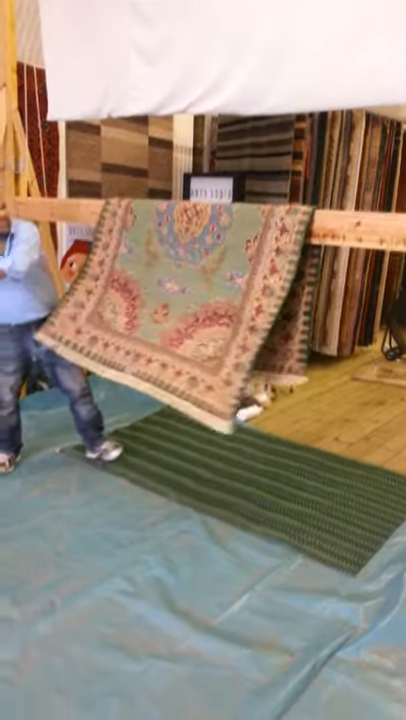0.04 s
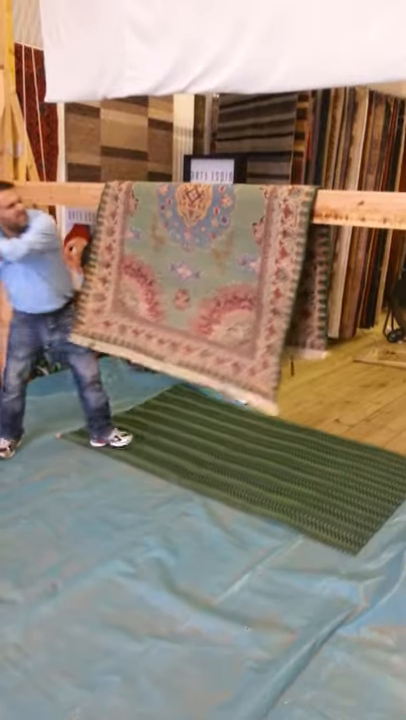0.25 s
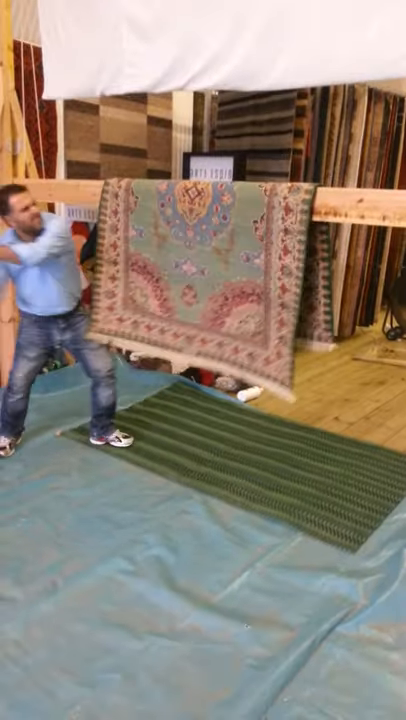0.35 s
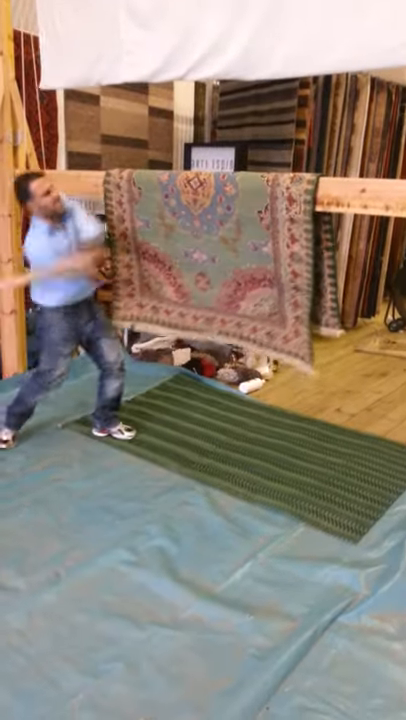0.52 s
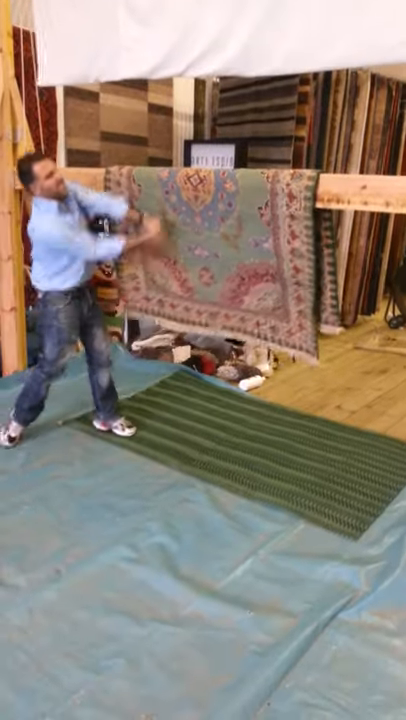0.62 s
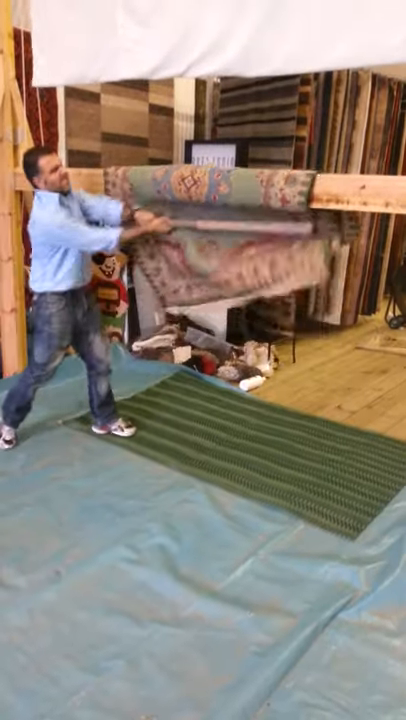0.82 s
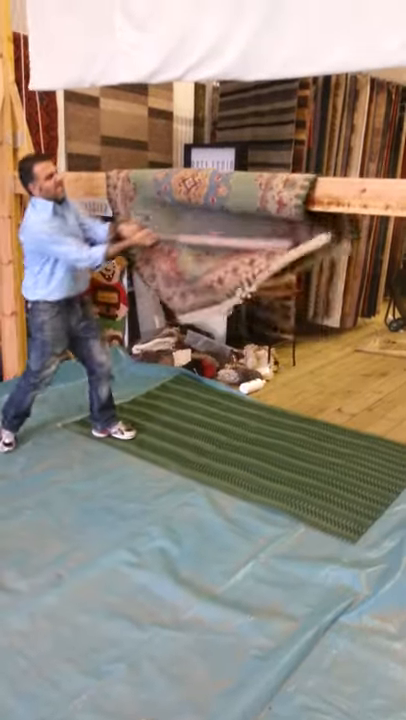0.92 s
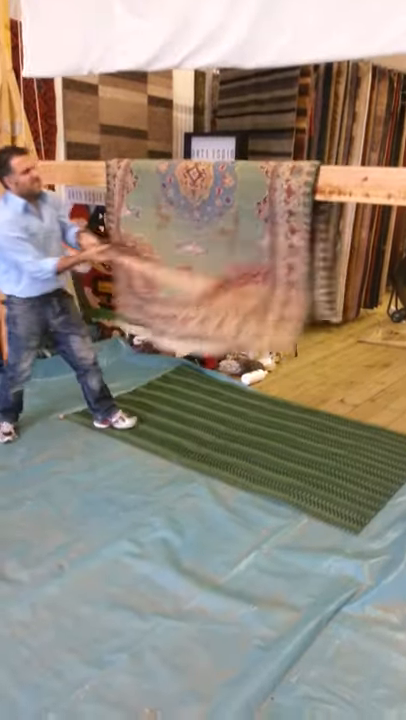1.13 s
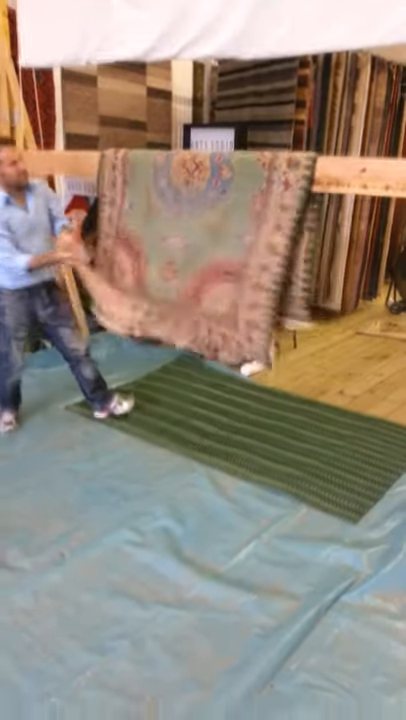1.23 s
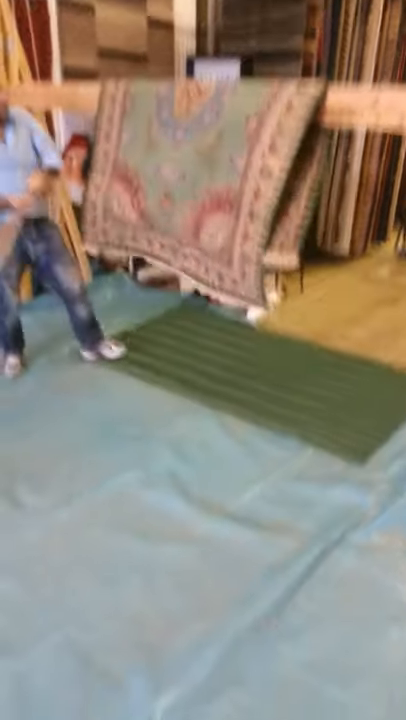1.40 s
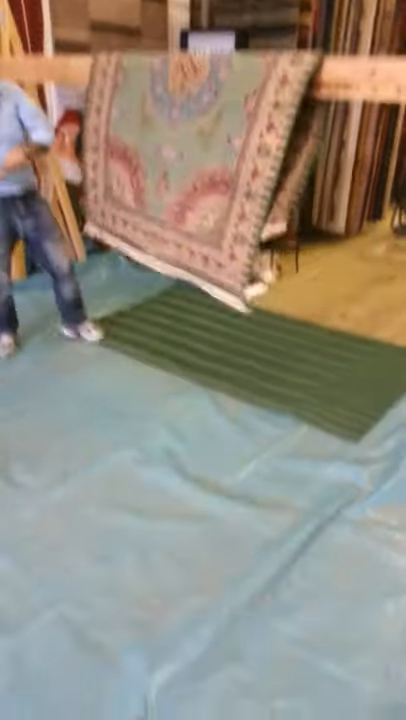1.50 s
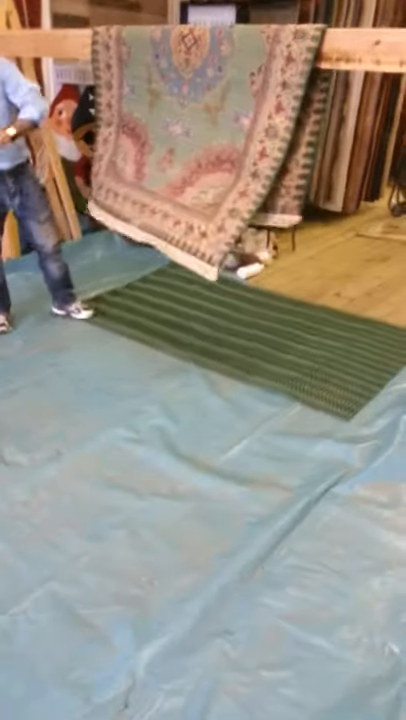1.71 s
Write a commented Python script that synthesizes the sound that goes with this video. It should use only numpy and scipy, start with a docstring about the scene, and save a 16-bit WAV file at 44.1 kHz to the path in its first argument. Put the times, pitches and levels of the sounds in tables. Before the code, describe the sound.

One loud, overloaded thwack on a thick rug, with a dull flap and ringing hall after

```python
"""A machine drones across a large workshop hall and swells; then, close by, a flat beater slaps a heavy rug on a beam.
The slap is a run of noise bursts that overloads two close microphones of a hand-held recorder.
The rug booms in decaying modes and flaps back dully, a few knocks ring modes of rug and wood, the hall rings on as noise.
The far drone is shaped noise with wandering hum tones; the overload lurches low at the slap; a low hum comes early."""
import sys
import numpy as np
from scipy import signal
from scipy.io import wavfile
from scipy.ndimage import uniform_filter1d

SR = 44100
rng = np.random.default_rng(int(sys.argv[2]) if len(sys.argv) > 2 else 0)


def pcm_store(signal):
    """Save signal as 16-bit PCM."""
    levels = np.round(np.clip(np.atleast_2d(signal), -1, 1) * 32767)
    wavfile.write(sys.argv[1], SR, levels.astype(np.int16).T)


N = 77175  # samples, 1.75 s

BLOW_S = 0.7305
# close slap, beater and rug layers clapping: start_s after the blow, level_db, brightness_db_per_octave
SLAP_CLAPS = [(0, 1, 2), (.005, 2.5, 1.5), (0.012, -6, 2), (0.019, -1, 1), (0.025, 0, 2.5), (0.034, -2, 1),
              (0.043, 3.5, -0.5), (0.055, -6, 2), (0.062, -7.5, 1.5), (0.072, -11, 1), (.09, -15, -0.5),
              (0.137, -4.5, -2.5), (0.181, -11, -1)]
# colour of the slap: pitch_hz, level_db per Hz
SLAP_SPECTRUM = [(40, -50), (120, -23.5), (250, -10.5), (420, -21), (550, -14), (850, -13.5), (1050, -12.5),
                 (1300, -13), (1600, -12.5), (2500, -13), (4500, -18), (6000, -28), (10000, -40),
                 (18000, -78)]
# how fast each clap dies away: pitch_hz, t60_s
SLAP_DECAY = [(100, 0.06), (400, 0.27), (1500, 0.052), (4500, 0.047), (7000, 0.044), (12000, 0.056)]
SLAP_DB, CLAP_RISE_S = -3.5, 0.00037
# later claps are duller: loss above the corner, dB per octave for each second after the blow
LATE_DULL_HZ, LATE_DULL_DB_PER_S = 5500, 152

# boom of the hanging rug: pitch_hz, level_db, t60_s, start_s after the blow
RUG_BOOM_MODES = [(210, 6.5, 0.085, 0.0183), (287, -3.5, 0.071, 0.0018), (314.7, 0.5, 0.14, 0.011),
                  (369.4, -8, 0.25, 0.0265), (504.5, 4, 0.071, 0.00058), (586.5, -0.5, 0.11, 0.016),
                  (731, -8, 0.25, 0.0061), (828, -7, 0.16, .055), (992, -3, 0.13, 0.011),
                  (1140, -6.5, 0.066, 0.0023)]
BOOM_RISE_CYCLES = 0.51  # low modes build slower

# low lurch of the overloaded recorder, strongest on the left; the right level is relative to the left
LURCH_S, LURCH_LENGTH_S, LURCH_HZ, LURCH_DB, LURCH_RIGHT_DB = 0.73, 0.043, 66.5, -11.5, -14

# a dull rug flap at 0.9118 s, then knocks: start_s, level_db, brightness_db_per_octave
FLAP_AND_KNOCKS = [(0.9118, -10, -10.5), (.9487, 0, 1.5), (1.0035, -8.5, 14), (1.2255, -20, -10),
                   (1.2575, -19, 0)]
# modes of rug (283, 520 Hz) and wood: pitch_hz, level_db, t60_s
FLAP_AND_KNOCK_MODES = [(283, -17.5, 0.083), (520, -26, 0.039), (686, -17, .06), (756, -13.5, 0.33),
                        (860, -18, .04), (987, -5, .07), (1112, -17.5, 0.04), (1320, -16, 0.018),
                        (1585, -18.5, 0.023)]
KNOCK_THIN_HZ, KNOCK_SOFT_HZ = 216, 2200  # low and high edges of flap and knocks

# ring of the hall after the slap: pitch_hz, level_db per Hz
HALL_SPECTRUM = [(40, -62), (120, -20), (200, -12), (285, -0.5), (420, -3), (700, -2.5), (1000, -7.5),
                 (1500, -14), (2500, -15.5), (4400, -12), (6000, -26.5), (8000, -33), (10000, -71)]
# decay of the hall: pitch_hz, t60_s
HALL_DECAY = [(100, 1.3), (400, 1.02), (1000, 1.5), (3000, 0.96), (8000, 0.43)]
HALL_DB, HALL_RISE_S = -4, 0.054

# drone of the far machine: pitch_hz, level_db per Hz
DRONE_SPECTRUM = [(40, -50), (90, -26.5), (185, -19), (225, -14), (300, -6), (410, -9), (480, -1),
                  (650, -2.5), (880, -4), (1100, -5.5), (1500, -11), (2100, -14), (3000, -12),
                  (4200, -17.5), (4900, -21), (5800, -32.5), (8000, -35.5), (10500, -43), (13000, -69)]
DRONE_DB = -23
# hum tones in the drone: pitch_hz, level_db rms at rest
DRONE_HUMS = [(231.5, -42), (290.7, -44), (349.9, -41.5), (463.0, -37), (662.1, -36), (753.7, -40),
              (888.2, -37.5)]
TONE_WANDER_HZ, TONE_WAVER_DB = 2.66, 0.5  # rms spreads
# drone swelling like a far reverberant stroke: start_s, level_db over the drone, rise_s, t60_s
DRONE_SWELLS = [(.228, 5.5, 0.014, 0.48), (.36, 5, 0.013, 0.85), (.455, -1, .012, 0.41),
                (1.21, 1, .012, 0.98), (1.46, 3.5, 0.014, 0.38), (1.525, -2, .01, 0.19)]
# colour of the swells: pitch_hz, level_db against the drone
SWELL_TILT = [(100, 0), (300, -1.5), (1000, 2.5), (3000, -0.5), (10000, 0.5)]

# a brief low hum
HUM_S, HUM_LENGTH_S, HUM_HZ, HUM_DB = 0.276, 0.19, 147, -43

# what the two microphones share: pitch_hz, likeness (-1 to 1)
MIC_LIKENESS = [(60, 0.65), (95, 0.96), (150, 0.91), (240, 0.96), (380, 0.82), (600, 0.66), (950, 0.45),
                (1500, -0.28), (2380, 0.41), (3770, -0.18), (5980, 0.02), (9470, -0.046), (15000, -0.45)]
# balance of the microphones: pitch_hz, left_over_right_db
MIC_BALANCE = [(60, 3), (240, 0.5), (950, 1), (1500, 2), (2200, 2), (2900, 7), (4000, 8.5), (4900, 6.5),
               (5700, 0), (7000, -6), (8800, -1.5), (10200, 14.5), (15000, 20)]
PATCHY_DB = 0.6  # slow unevenness of each noise band
MIC_LOW_HZ, CUTOFF_HZ = 115, 16500  # bass roll-off, and edge of the top cut
DUCK_DB_PER_DB, DUCK_FROM_DB, RECOVER_DB_PER_S = 0.2972, -13, 24.5
CLIP_TOP, CLIP_HARDNESS = 1.04, 4.0


def from_db(db):
    """Decibels to amplitude gain."""
    return 10 ** (np.asarray(db) / 20)


def at_hz(points, hz):
    """Reads a pitch table on a log-frequency axis."""
    table = np.array(points)
    return np.interp(np.log(hz), np.log(table[:, 0]), table[:, 1])


def rms_one(x):
    """Scales to rms 1."""
    return x / np.sqrt(np.mean(x ** 2) + 1e-20)


def burst(start, rise, t60):
    """Amplitude envelope: quick rise, exponential fall."""
    t = np.maximum(np.arange(N) / SR - start, 0)
    return (1 - np.exp(-t / rise)) * from_db(-60 * t / t60)


def swell(start, length, hz):
    """A low tone that swells and fades."""
    t = np.arange(N) / SR - start
    return np.sin(np.pi * np.clip(t / length, 0, 1)) ** 2 * np.sin(2 * np.pi * hz * t)


def drift(rate):
    """Slow random wander of spread 1: smoothed noise drawn every 40 samples."""
    r = np.exp(-80 * np.pi * rate / SR)
    noise = rng.standard_normal(N // 40 + 1002)
    slow = signal.lfilter([1], [1, -2 * r, r * r], noise)[1000:]
    return np.interp(np.arange(N) / 40, np.arange(len(slow)), rms_one(slow))


def total_db(spectrum):
    """Whole power of a per-Hz spectrum, in dB."""
    hz = np.arange(40, 18000, 20)
    return 10 * np.log10(20 * np.sum(from_db(at_hz(spectrum, hz)) ** 2))


def density_db(spectrum, level_db, hz):
    """Level per Hz at one pitch when the whole spectrum adds up to level_db."""
    return level_db + at_hz(spectrum, hz) - total_db(spectrum)


def ring(x, hz, t60):
    """A resonator: a unit click sets a decaying sine of height 1 ringing."""
    r = from_db(-60 / (t60 * SR))
    w = 2 * np.pi * hz / SR
    return signal.lfilter([0, np.sin(w)], [1, -2 * r * np.cos(w), r * r], x + 1e-18)


def pair(mid, side, hz):
    """Two microphones whose likeness and balance depend on pitch."""
    alike = np.clip(at_hz(MIC_LIKENESS, hz), -1, 1)
    shared = np.sqrt((1 + alike) / 2) * mid
    opposed = np.sqrt((1 - alike) / 2) * side * np.array([[1], [-1]])
    return (shared + opposed) * from_db(at_hz(MIC_BALANCE, hz) * np.array([[0.5], [-0.5]]))


def slap_power(hz):
    """Close slap: power per Hz of the claps, each a sharp burst with its own brightness."""
    power = 0
    for s, db, tilt_db in SLAP_CLAPS:
        bright_db = tilt_db * np.log2(hz / 500)
        dull_db = LATE_DULL_DB_PER_S * s * max(np.log2(hz / LATE_DULL_HZ), 0)
        clap = burst(BLOW_S + s, CLAP_RISE_S, at_hz(SLAP_DECAY, hz))
        power = power + (from_db(db + bright_db - dull_db) * clap) ** 2
    return power * from_db(density_db(SLAP_SPECTRUM, SLAP_DB, hz)) ** 2


def boom():
    """The slap rings the modes of the rug; each microphone meets them at its own phase."""
    out, t = 0, np.arange(N) / SR - BLOW_S
    for hz, db, t60, lag in RUG_BOOM_MODES:
        a, b = rng.uniform(0, 2 * np.pi, 2)
        shape = from_db(db) * burst(BLOW_S + lag, BOOM_RISE_CYCLES / hz, t60)
        angle = 2 * np.pi * hz * t
        out = out + shape * pair(np.sin(angle + a), np.sin(angle + b), hz)
    return out


def overload_lurch():
    """Low lurch of the overloaded recorder at the slap, strongest on the left: one short low swell."""
    gain = from_db([[LURCH_DB], [LURCH_DB + LURCH_RIGHT_DB]])
    return gain * swell(LURCH_S, LURCH_LENGTH_S, LURCH_HZ)


def flap_and_knocks():
    """Soft clicks ring modes of rug and wood, straight ahead; the dull flap favours the low modes."""
    out = 0
    for hz, mode_db, t60 in FLAP_AND_KNOCK_MODES:
        clicks = np.zeros(N)
        for s, db, tilt_db in FLAP_AND_KNOCKS:
            clicks[int(s * SR)] = -from_db(db + mode_db + tilt_db * np.log2(hz / 1000))
        out = out + ring(clicks, hz, t60)
    return signal.lfilter(*signal.butter(2, [KNOCK_THIN_HZ, KNOCK_SOFT_HZ], "band", fs=SR), out)


def hall_power(hz):
    """Hall: reverberant power per Hz builds after the blow and decays at its own rate per pitch."""
    envelope = burst(BLOW_S, HALL_RISE_S, at_hz(HALL_DECAY, hz))
    return (from_db(density_db(HALL_SPECTRUM, HALL_DB, hz)) * envelope) ** 2


def swelling(hz):
    """Power of the drone over time, 1 at rest; each swell adds a rising and decaying share."""
    power = 1
    for s, db, rise, t60 in DRONE_SWELLS:
        power = power + (from_db(db + at_hz(SWELL_TILT, hz)) * burst(s, rise, t60)) ** 2
    return power


def drone_power(hz):
    """Machine further off: steady power per Hz, raised by the swells."""
    return from_db(density_db(DRONE_SPECTRUM, DRONE_DB, hz)) ** 2 * swelling(hz)


def noise_field():
    """Slap, hall and drone as quarter-octave bands of diffuse noise, each following its power."""
    out, edges = 0, 40 * 2 ** (np.arange(36) / 4)
    white, together = rng.standard_normal((2, 2, N + 4000)), drift(15.0)
    for k, (low, high) in enumerate(zip(edges, edges[1:])):
        sos = signal.butter(3, [low, high], "band", fs=SR, output="sos")
        # neighbouring bands use different noise; scaled to unit power per Hz
        mid, side = signal.sosfilt(sos, white[k % 2])[:, -N:] * np.sqrt(SR / 2)
        hz = np.sqrt(low * high)
        power = slap_power(hz) + hall_power(hz) + drone_power(hz)
        patchy = from_db(PATCHY_DB * (0.83 * together + drift(2.2)))
        out = out + np.sqrt(power) * patchy * pair(mid, side, hz)
    return out


def drone_tones():
    """Near-steady sines of the machine that wander a little and swell with the drone."""
    out = 0
    for hz, db in DRONE_HUMS:
        phase = 2 * np.pi * (np.cumsum(hz + TONE_WANDER_HZ * drift(3.01)) / SR + rng.random())
        gain = from_db(db + TONE_WAVER_DB * drift(3.3)) * np.sqrt(2 * swelling(hz))
        out = out + gain * pair(np.sin(phase), np.cos(phase), hz)
    return out


def low_hum():
    """A faint low sine that swells and fades, alike in both microphones."""
    return from_db(HUM_DB) * swell(HUM_S, HUM_LENGTH_S, HUM_HZ)


def scene():
    """All sources at the microphones; the bass roll-off spares the lurch and the low hum."""
    roll_off = signal.butter(3, MIC_LOW_HZ, "high", fs=SR, output="sos")
    air = signal.sosfilt(roll_off, noise_field() + drone_tones() + boom() + flap_and_knocks())
    return air + overload_lurch() + low_hum()


def record(dry):
    """Gain control ducks on loud sound and recovers, overload flattens the peaks, the top is cut."""
    power = uniform_filter1d(np.mean(dry ** 2, axis=0), size=441)  # 10 ms average
    level_db = 10 * np.log10(power + 1e-12)
    wanted_db = DUCK_DB_PER_DB * np.maximum(level_db - DUCK_FROM_DB, 0)
    # a running maximum against a ramp holds the cut, then releases it at a steady rate
    ramp = RECOVER_DB_PER_S * np.arange(N) / SR
    cut_db = np.maximum.accumulate(wanted_db + ramp) - ramp
    cut_db = signal.lfilter([0.001], [1, -0.999], cut_db)  # the gain eases in and out
    x = dry * from_db(-cut_db) / CLIP_TOP
    x = CLIP_TOP * x / (1 + np.abs(x) ** CLIP_HARDNESS) ** (1 / CLIP_HARDNESS)
    top_cut = signal.cheby2(6, 30, CUTOFF_HZ, fs=SR, output="sos")
    return np.clip(signal.sosfilt(top_cut, x), -1, 1)


dry = scene()
out = record(dry)
pcm_store(out)
```